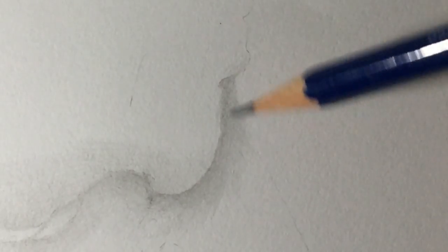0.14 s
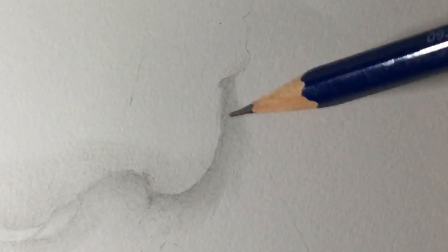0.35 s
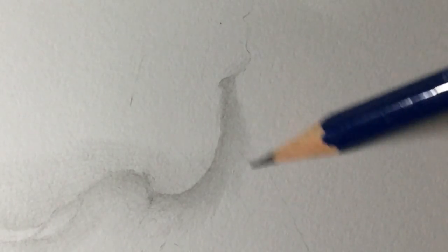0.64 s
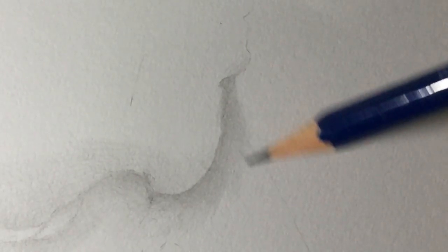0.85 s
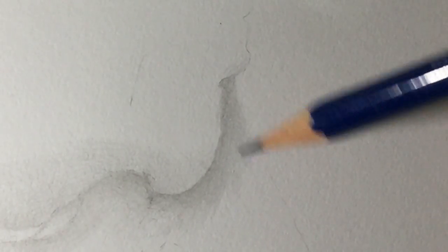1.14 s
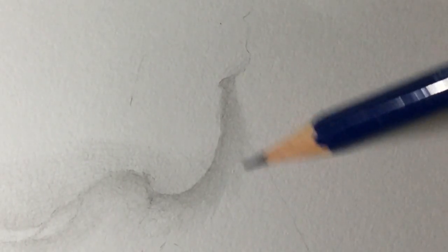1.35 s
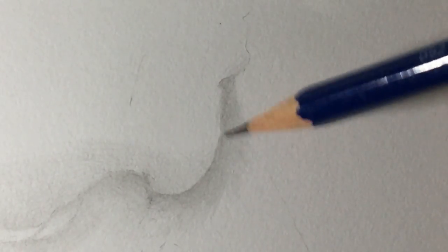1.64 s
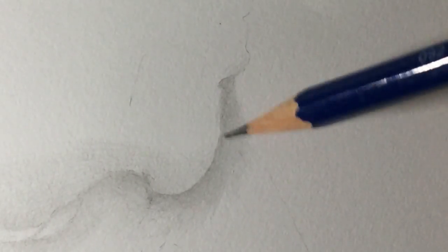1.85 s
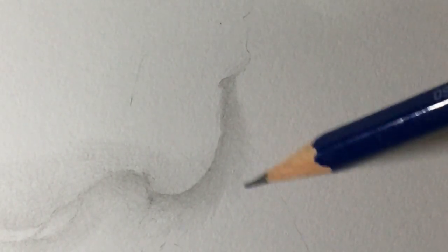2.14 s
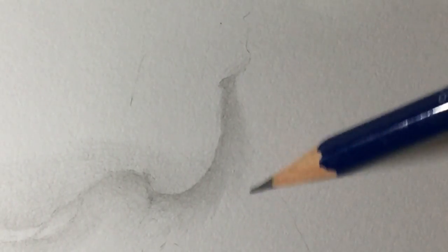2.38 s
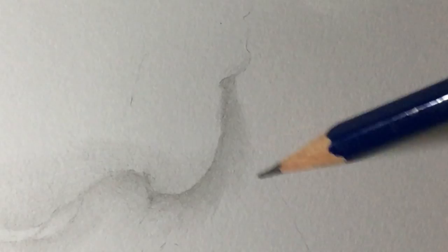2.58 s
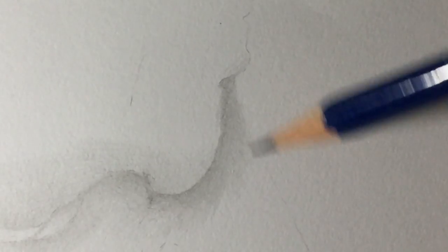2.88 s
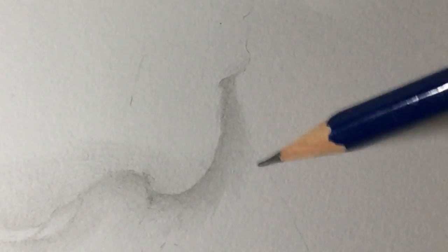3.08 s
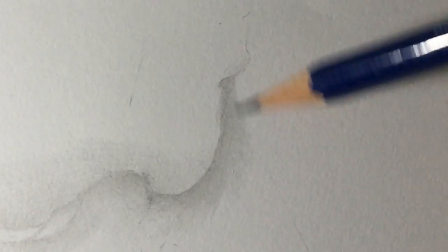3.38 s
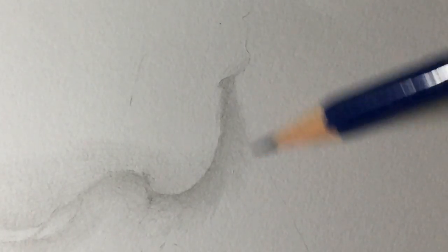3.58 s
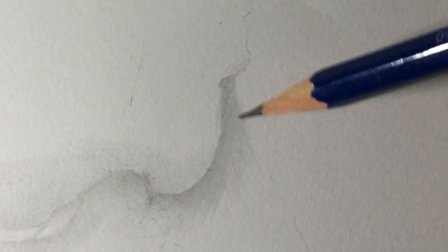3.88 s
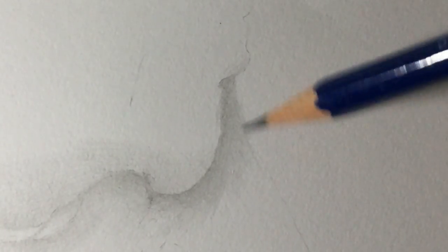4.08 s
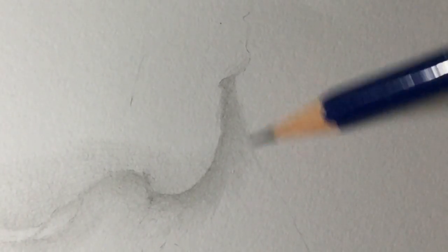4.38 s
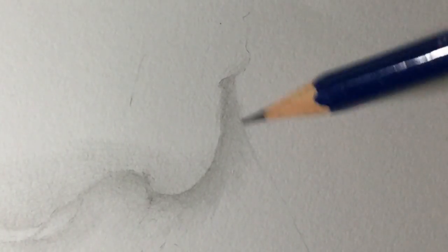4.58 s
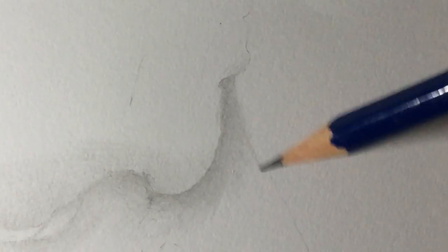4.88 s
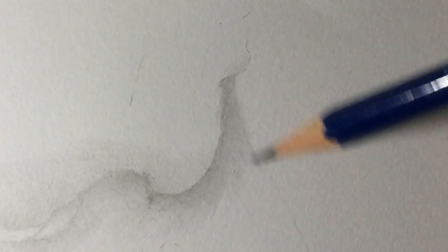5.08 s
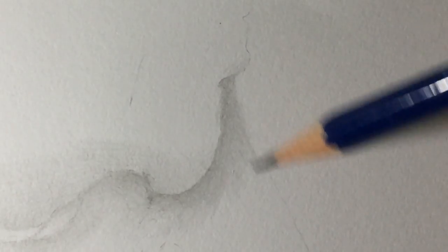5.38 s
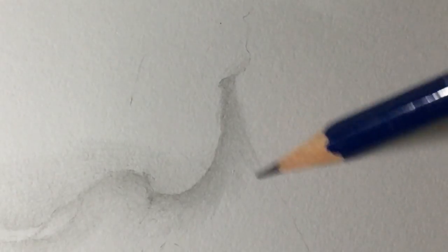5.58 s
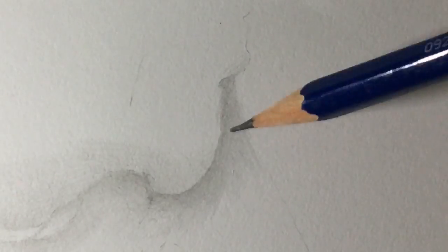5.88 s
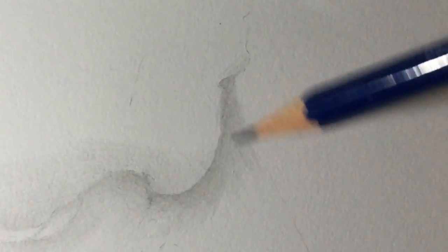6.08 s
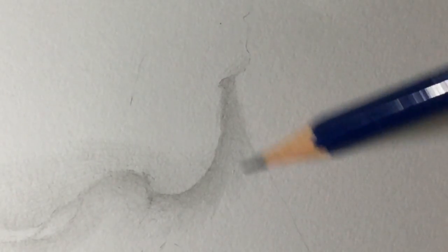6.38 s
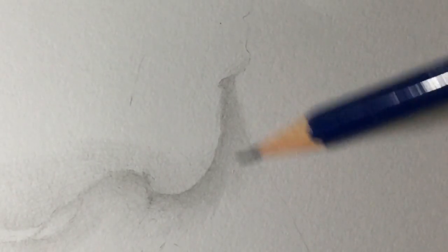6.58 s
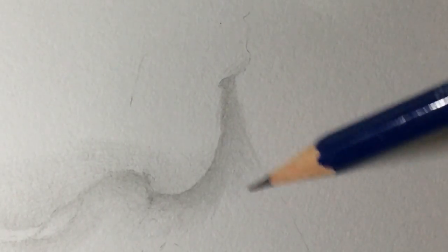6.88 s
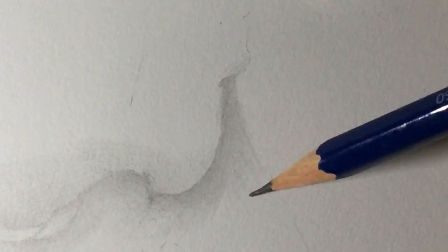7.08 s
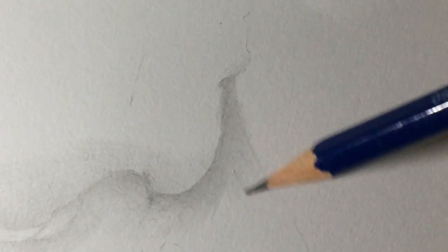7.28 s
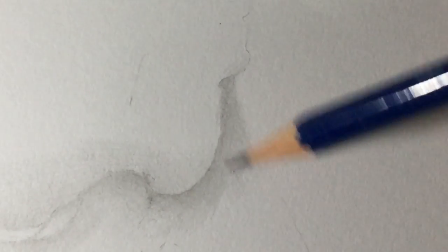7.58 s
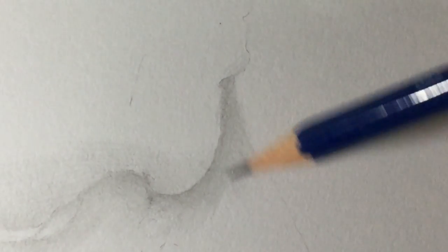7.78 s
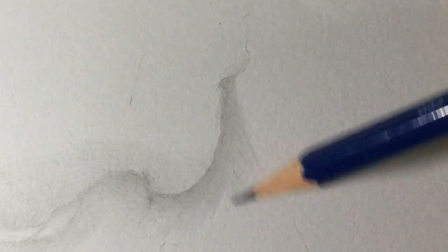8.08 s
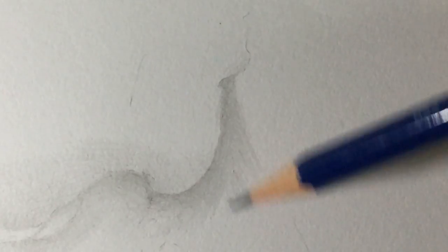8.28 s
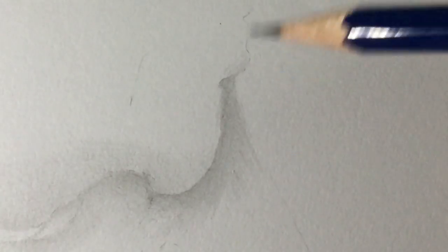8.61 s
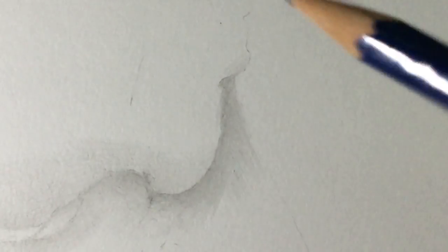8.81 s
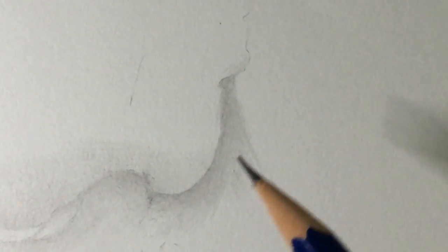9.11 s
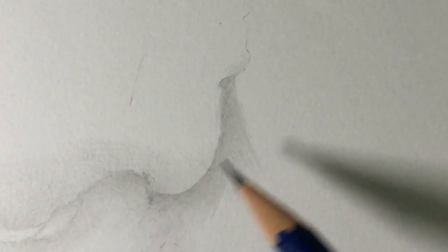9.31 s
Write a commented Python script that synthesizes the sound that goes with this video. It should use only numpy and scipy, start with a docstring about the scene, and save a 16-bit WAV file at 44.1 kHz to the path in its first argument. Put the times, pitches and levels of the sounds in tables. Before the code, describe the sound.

A pencil shades paper in quick, even, bright scratchy strokes, over four a second, then a tiny metallic jingle and dry rustle as the hand leaves.

```python
"""Pencil shading, close up

A pencil shades paper in quick one-way strokes, close to the microphone, in a quiet room.
The lead drags over the paper tooth and rings shaft and sheet; it often grazes the sheet again on lifting.
Late on, the hand moves off: a small metal thing jingles, with a dry rustle and ticks as the grip loosens.
Behind lie room rumble, hums, far brief tones and hiss; slow air pushes on the microphone."""
import sys
import numpy as np
from scipy import signal
from scipy.fft import rfft, irfft, next_fast_len
from scipy.io import wavfile
from scipy.ndimage import uniform_filter1d

SR = 44100
rng = np.random.default_rng(int(sys.argv[2]) if len(sys.argv) > 2 else 0)


def file_out(sig):
    """Save sig as 16-bit WAV at sys.argv[1]."""
    # one column per channel
    cols = np.atleast_2d(sig).T
    # limit, then scale
    lim = np.clip(cols, -1, 1)
    pcm = np.round(lim * 32767).astype(np.int16)
    wavfile.write(sys.argv[1], SR, pcm)


def magnitude_from_level(level_db):
    """Linear magnitude for a level in decibels (20 dB per decade)."""
    exponent = np.asarray(level_db, float) / 20
    return 10 ** exponent


N = 416742  # samples

# Strokes of the lead. Each row: touch in seconds, length in seconds, level in dB before the stroke shape,
# loudest point as a share of the length, extra level of the lower pencil modes in dB.
STROKES = [(-0.054, 0.077, -47, 0.46, 5), (0.169, 0.092, -52, 0.35, -2), (0.386, 0.089, -53, 0.3, -1),
           (0.6, 0.089, -51.5, 0.46, 1.5), (0.815, 0.088, -52, 0.37, 2), (1.029, 0.09, -51, 0.41, 0),
           (1.24, 0.089, -50.5, 0.38, 0), (1.458, 0.093, -52.5, 0.3, 1), (1.669, 0.09, -53, 0.33, -1),
           (1.877, 0.095, -52.5, 0.37, -0.5), (2.096, 0.087, -52, 0.37, 0), (2.308, 0.086, -54, 0.32, 1),
           (2.555, 0.054, -55, 0.37, -3), (2.761, 0.095, -52, 0.41, -1), (2.994, 0.096, -51.5, 0.35, 1),
           (3.228, 0.089, -51, 0.37, 0), (3.451, 0.1, -51, 0.37, -0.5), (3.685, 0.1, -53.5, 0.39, 0.5),
           (3.918, 0.096, -54, 0.31, 1), (4.154, 0.09, -53, 0.39, 0.5), (4.379, 0.086, -52.5, 0.37, 1),
           (4.613, 0.076, -53.5, 0.37, -1), (4.83, 0.089, -51.5, 0.44, -1), (5.052, 0.091, -51, 0.55, 0),
           (5.273, 0.091, -50, 0.41, 0), (5.491, 0.092, -53, 0.34, 0.5), (5.704, 0.095, -49, 0.4, -1),
           (5.932, 0.091, -50.5, 0.37, 1), (6.145, 0.092, -52, 0.43, -1), (6.361, 0.088, -51, 0.39, 1),
           (6.58, 0.086, -53, 0.34, 1), (6.8, 0.092, -54, 0.37, 0), (7.011, 0.091, -51.5, 0.34, 0),
           (7.231, 0.094, -51, 0.48, 0), (7.444, 0.09, -52.5, 0.48, -1), (7.658, 0.089, -53.5, 0.37, -2),
           (7.869, 0.095, -51.5, 0.42, -2), (8.077, 0.073, -54, 0.32, 0), (8.262, 0.078, -52.5, .55, -1)]
# Short grazes of the lead in the air stroke. Each row: centre in seconds, peak level in dB.
GRAZES = [(0.061, -67), (1.141, -70.2), (1.568, -74), (1.783, -62), (2.202, -76), (2.406, -73),
          (2.972, -75.5), (3.343, -71), (3.581, -66), (4.036, -72.5), (5.165, -68.8), (6.476, -69),
          (6.693, -62), (7.343, -66), (7.557, -66), (7.769, -73.5)]
# Resonances of pencil and sheet. Each row: frequency in Hz, width of one pass in Hz, relative gain in dB.
PENCIL_MODES = [(2100, 900, -10.5), (3310, 1000, -14.5), (4764, 660, -9), (6120, 540, -16), (7015, 550, -4),
                (7510, 710, -1), (8300, 950, -6), (9500, 1600, -12), (10350, 870, 0), (11730, 440, -9),
                (12200, 550, -6), (13500, 530, -9.5), (13900, 520, 0.5), (15000, 550, -5), (15400, 510, -8)]
# Ringing modes of the small metal thing. Each row: frequency in Hz, width in Hz, relative level in dB.
METAL_MODES = [(9470, 55, 0), (10785, 50, 0), (11030, 40, -6), (11712, 50, 0), (13200, 50, 0),
               (14040, 90, 1), (14300, 40, -7)]
# Jolts of the metal by the hand. Each row: peak in seconds, then the levels in dB of the low,
# middle and high modes, before each mode's own level.
JOLTS = [(8.135, -72, -82, -76), (8.23, -74, -81, -86), (8.318, -54.5, -61, -59), (8.355, -67, -67, -66),
         (8.445, -71, -75, -79), (8.57, -67, -82, -77), (8.772, -64, -72, -62)]
# Rustles of the hand moving off. Each row: loudest moment in seconds, length in seconds, peak level in dB.
RUSTLES = [(8.36, 0.067, -70), (8.42, .05, -71), (8.6, 0.21, -71), (8.753, 0.14, -66), (8.87, .08, -70),
           (8.97, .08, -74)]
# Dry ticks as the grip loosens. Each row: start in seconds, starting level in dB, centre in Hz,
# width in Hz, fade time in seconds.
TICKS = [(8.227, -53, 9000, 12000, 0.0036), (8.32, -62, 5450, 900, 0.025), (8.599, -60, 9000, 9000, .004),
         (8.61, -64, 4250, 500, .012), (8.764, -58, 7000, 8000, .005), (8.86, -67, 5000, 3000, .02)]
# Slow air on the microphone. Each row: time in seconds, gust level in dB.
AIR_GUSTS = [(0.05, -24.5), (0.85, -29), (1.32, -36), (1.55, -25.5), (2.1, -28.5), (2.6, -25), (3.1, -22),
             (3.3, -32.5), (4.22, -23.5), (4.5, -29.5), (5.95, -22), (7.15, -20.5), (7.4, -31), (7.92, -14),
             (8.21, -9), (8.52, -15), (8.73, -12), (8.95, -22.5), (9.4, -18)]
# Midrange of the room. Each row: time in seconds, level in dB.
ROOM_LEVEL = [(0.05, -50.5), (1.08, -51), (2.33, -55), (3.73, -54), (5.49, -55.5), (7.69, -52), (8.42, -54),
              (9.35, -53)]
# Spectrum of the room noise. Each row: frequency in Hz, relative density in dB per Hz.
ROOM_SPECTRUM = [(12, 30), (25, -8.5), (33, 8), (47, -1.5), (78, -9.5), (160, -9), (490, -14), (540, -18.5),
                 (720, -22.5), (950, -20.5), (1500, -27.5), (2200, -36), (2450, -38.5), (7000, -54)]
# Wavering hums and whines. Each row: frequency in Hz, width of one pass in Hz, rms level in dB.
HUMS = [(21.78, 2.8, -38.5), (92.28, 2.2, -52.5), (99.73, 1.37, -54), (128.22, 3.06, -50.5),
        (132.9, 3.04, -51.5), (290.3, 19.3, -61), (491.8, 8.2, -69), (1109, 32, -68.5), (2104, 134, -74.5),
        (10600, 130, -94)]
# A thin whine that fades away. Each row: time in seconds, rms level in dB.
WHINE_LEVEL = [(0, -83), (2, -83), (6, -85), (8.5, -90), (9.45, -92)]
# Faint brief tones far away. Each row: centre in seconds, length in seconds, frequency in Hz, peak in dB.
PEEPS = [(4.292, .07, 1360, -53), (7.515, 0.22, 896, -52), (9.3, 0.32, 573, -54)]
# Spectrum of the microphone hiss. Each row: frequency in Hz, relative density in dB per Hz.
HISS_SPECTRUM = [(500, 16), (5000, 4.5), (10000, -2), (16000, -22)]


def clock():
    """Time of every sample in seconds."""
    return np.arange(N) / SR


def in_time(rows):
    """Level column of a two-column table as a curve over all samples."""
    seconds, level = np.transpose(rows)
    return np.interp(clock(), seconds, level)


def bell(t, centre, length):
    """Smooth swell and fade, `length` seconds wide where it is 1/e of its peak of 1."""
    return np.exp(-((t - centre) / length * 2) ** 2)


def rms_one(x):
    """Scale to unit power."""
    return x / np.sqrt(np.mean(x ** 2) + 1e-20)


def resonance(x, hz, width_hz):
    """Two-pole peak of gain 1."""
    r = np.exp(-np.pi * width_hz / SR)
    zeros = np.array([1, 0, -1]) * (1 - r * r) / 2
    poles = [1, -2 * r * np.cos(2 * np.pi * hz / SR), r * r]
    return signal.lfilter(zeros, poles, x)


def resonance_twice(x, hz, width_hz):
    """The same peak applied twice, for steeper skirts."""
    return resonance(resonance(x, hz, width_hz), hz, width_hz)


def narrow_noise(hz, width_hz):
    """Wavering tone: noise twice through one resonance, run in for a second; rms 1."""
    white = rng.standard_normal(N + SR)
    return rms_one(resonance_twice(white, hz, width_hz)[SR:])


def coloured(spectrum):
    """Steady noise with a given spectrum, joined up over log frequency."""
    size = next_fast_len(N)
    hz = np.maximum(np.arange(size // 2 + 1) * SR / size, 1)
    point_hz, point_db = np.transpose(spectrum)
    shape_db = np.interp(np.log(hz), np.log(point_hz), point_db, left=-80)
    return irfft(rfft(rng.standard_normal(size)) * magnitude_from_level(shape_db), size)[:N]


def drift(rate):
    """Slow random curve of spread about 1, with `rate` knots a second."""
    knots = rng.standard_normal(1000)
    return np.interp(clock() * rate, np.arange(1000), knots) * np.sqrt(1.5)


def grains(per_s, spread_db):
    """Fibres of the paper let go at random, each a click of its own size; rms 1."""
    sizes_db = spread_db * np.minimum(rng.exponential(1, N), 5)
    clicks = magnitude_from_level(sizes_db) * rng.choice([-1, 1], N)
    return rms_one(clicks * (rng.random(N) < per_s / SR))


def strokes():
    """Drag of the lead on the paper: quick landing, swell, ebb, quick lift and a short afterglow."""
    landing_s, lift_s, glow_s = 0.013, 0.019, 0.06
    # before landing, at touch, halfway up, at the top, before the lift, at the lift, end of the afterglow
    shape_db = [-39, -11, -1.5, 1.5, -3.5, -13.5, -39]
    t, drag = clock(), np.zeros(N)
    for touch, length, db, top, _ in STROKES:
        near = slice(max(int((touch - 0.03) * SR), 0), int((touch + length + 0.12) * SR))
        since_touch = np.array([-landing_s, 0, top * length / 2, top * length,
                                length - lift_s, length, length + glow_s])
        curve_db = np.interp(t[near], touch + since_touch, shape_db, left=-150, right=-150)
        drag[near] += magnitude_from_level(db + curve_db)
    return drag


def grazes():
    """Light, short brushes of the lead on the sheet, as bell-shaped extra drag."""
    graze_s = 0.005  # from the peak to 1/e
    t, drag = clock(), np.zeros(N)
    for s, db in GRAZES:
        near = slice(int((s - 0.03) * SR), int((s + 0.03) * SR))
        drag[near] += magnitude_from_level(db) * np.exp(-((t[near] - s) / graze_s) ** 2)
    return drag


def low_colour():
    """Extra dB of the lower pencil modes, stepping to each stroke's value just before its touch."""
    touch, *_, low_db = np.transpose(STROKES)
    stroke = np.searchsorted(touch - 0.05, clock()) - 1
    return low_db[np.maximum(stroke, 0)]


def body(trains):
    """Parallel resonances of pencil and sheet; neighbours answer to different fibres."""
    return [magnitude_from_level(db) * resonance_twice(trains[k % 2], hz, width_hz)
            for k, (hz, width_hz, db) in enumerate(PENCIL_MODES)]


def pencil():
    """Paper grains under the drag ring the pencil; each mode's share flickers."""
    rasp = magnitude_from_level(0.75 * drift(70))
    tooth = np.array([grains(30000, spread_db=2.2), grains(30000, spread_db=2.2)]) * rasp
    scale = np.std(sum(body(tooth)))  # rings at rms 1 under a drag of 1
    drag = strokes() + grazes()
    low_db = low_colour()
    out = np.zeros(N)
    for (hz, *_), mode in zip(PENCIL_MODES, body(tooth * drag + 1e-18)):
        colour_db = low_db if hz < 6300 else 0
        flicker_db = 0.6 * drift(8) + 1.0 * drift(60)
        out += mode * magnitude_from_level(colour_db + flicker_db)
    return out / scale


def jingle():
    """Around each jolt tiny touches keep thin metal modes ringing."""
    rise_db_per_s, fade_db_per_s = 500, 260
    t = clock()
    shaking = np.zeros((3, N))  # low, middle and high modes
    for s, *group_db in JOLTS:
        below_peak_db = np.maximum(rise_db_per_s * (s - t), fade_db_per_s * (t - s))
        shaking += magnitude_from_level(np.array(group_db)[:, None] - below_peak_db)
    out = np.zeros(N)
    for hz, width_hz, db in METAL_MODES:
        group = int(hz > 10000) + int(hz > 12500)
        ringing = rms_one(resonance(grains(900, spread_db=1.0), hz, width_hz))
        out += magnitude_from_level(db) * shaking[group] * ringing
    return out


def rustle(fibres):
    """Dry broad crackle of many fibres, swelling as the hand moves off."""
    t = clock()
    swell = sum(magnitude_from_level(db) * bell(t, s, length) for s, length, db in RUSTLES)
    return swell * rms_one(resonance_twice(fibres, 6000, 12000.0))


def ticks(fibres):
    """Each tick starts at once and dies exponentially, in its own band of the crackle."""
    t, out = clock(), np.zeros(N)
    for s, db, hz, width_hz, fade in TICKS:
        decay = (t >= s) * np.exp(-np.maximum(t - s, 0) / fade)
        out += magnitude_from_level(db) * decay * rms_one(resonance(fibres, hz, width_hz))
    return out


def air():
    """Pressure swings below hearing, about seven a second, their size set by the gust."""
    swing = narrow_noise(6.89, 4.05)
    # dividing by the quarter-second size evens the swings out
    size = np.sqrt(uniform_filter1d(swing ** 2, size=SR // 4) + 0.033)
    low_pass = signal.butter(4, 13, fs=SR, output="sos")
    return signal.sosfilt(low_pass, magnitude_from_level(in_time(AIR_GUSTS)) * swing / size)


def rumble():
    """Broad room noise: the midrange swells and sinks while the rest stays steady."""
    noise = coloured(ROOM_SPECTRUM)
    middle = resonance(noise, 1200, 2500.0)
    rest = noise - middle
    return (magnitude_from_level(-52.5) * rest + magnitude_from_level(in_time(ROOM_LEVEL)) * middle) / np.std(middle)


def hums():
    """Wavering hums of the room as narrow noise, and one thin whine that fades away."""
    steady = sum(magnitude_from_level(db) * narrow_noise(hz, width_hz) for hz, width_hz, db in HUMS)
    whine = magnitude_from_level(in_time(WHINE_LEVEL)) * narrow_noise(13700, 150)
    return steady + whine


def peeps():
    """Faint far tones: plain sines that swell and fade."""
    t = clock()
    return sum(magnitude_from_level(db) * bell(t, s, length) * np.sin(2 * np.pi * hz * t) for s, length, hz, db in PEEPS)


def hiss():
    """Steady microphone hiss at -69 dB rms."""
    return magnitude_from_level(-69) * rms_one(coloured(HISS_SPECTRUM))


def scene():
    """All sources at one microphone."""
    fibres = grains(6000, spread_db=2.5)  # shared by rustle and ticks
    hand = jingle() + rustle(fibres) + ticks(fibres)
    room = rumble() + hums() + peeps() + hiss()
    return (pencil() + hand + air() + room)[None]


def band_limit(x):
    """A steep low-pass at the top of the band."""
    return signal.sosfilt(signal.butter(12, 15980, fs=SR, output="sos"), x)


def record(dry):
    """The top is cut sharply above 15770 Hz."""
    top_cut = signal.ellip(12, 0.2, 50, 15770, fs=SR, output="sos")
    return band_limit(signal.sosfilt(top_cut, dry))


dry = scene()
out = record(dry)
file_out(out)
```